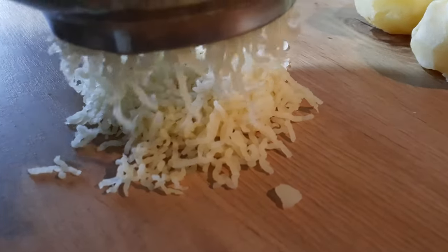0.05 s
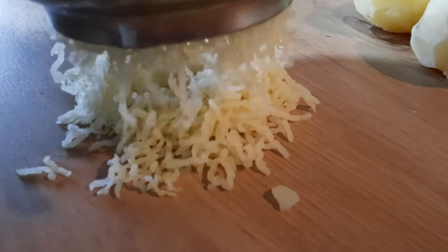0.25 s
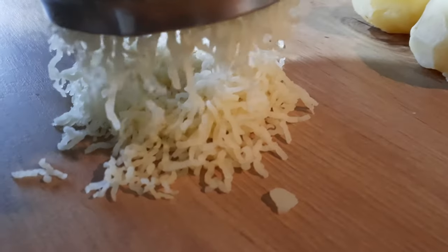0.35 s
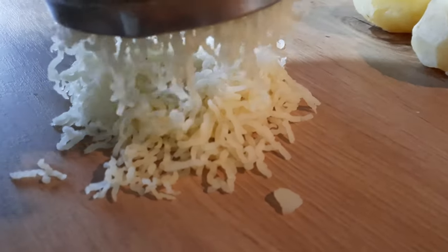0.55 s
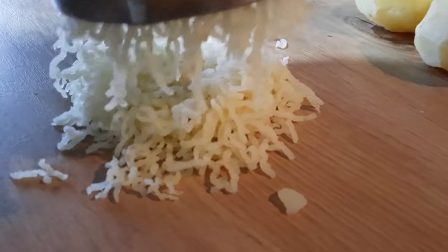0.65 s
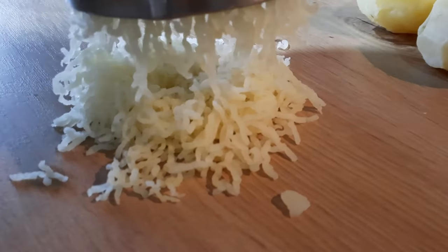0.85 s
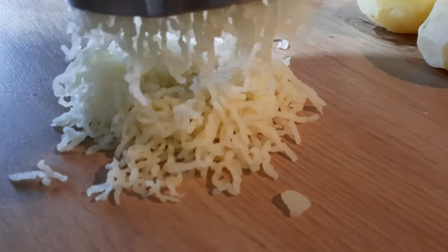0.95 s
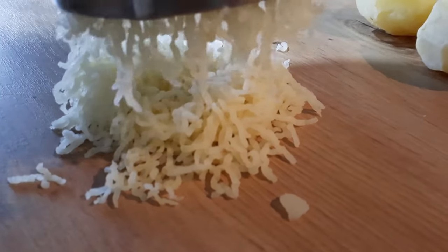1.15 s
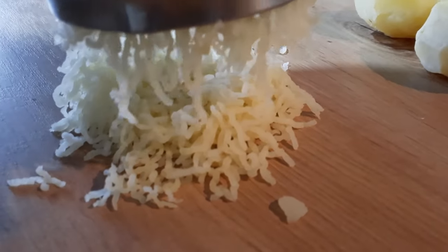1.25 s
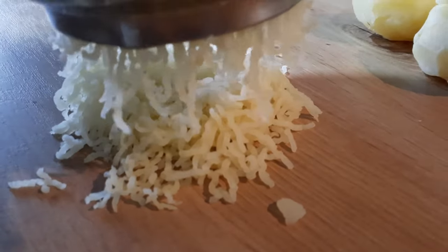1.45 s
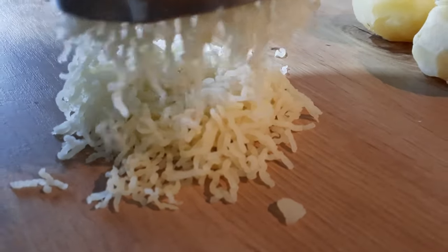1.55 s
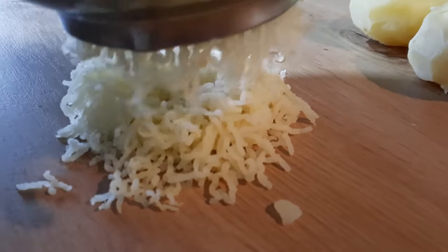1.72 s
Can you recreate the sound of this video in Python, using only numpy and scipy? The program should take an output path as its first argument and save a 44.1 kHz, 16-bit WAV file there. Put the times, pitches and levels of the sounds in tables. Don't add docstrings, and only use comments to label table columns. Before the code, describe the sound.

Metal food mill scraping potato through its perforated plate, gritty hiss and ringing catches, ending in a bright tick

```python
import sys
import numpy as np
from scipy import signal
from scipy.fft import rfft, irfft
from scipy.io import wavfile

SR = 44100
rng = np.random.default_rng(int(sys.argv[2]) if len(sys.argv) > 2 else 0)


def invert_db(x):
    u = np.asarray(x, float) / 20
    return 10 ** u


def put_to_file(sound):
    columns = np.atleast_2d(sound).T
    safe = np.clip(columns, -1, 1)
    whole_steps = np.round(safe * 32767)
    wavfile.write(sys.argv[1], SR, whole_steps.astype(np.int16))


N = 79380
HZ = np.arange(N // 2 + 1) * SR / N
LAG_S = 0.0004214
JOLT_S = 0.0082

# (time [s], level [dB])
PRESSURE = [(0.195, -74), (0.205, -48), (0.243, -61), (0.259, -47), (0.345, -50.5), (0.429, -38),
            (0.501, -38.5), (0.509, -39.5), (0.623, -36.5), (0.635, -47), (0.763, -49.5), (0.885, -48),
            (1.109, -59), (1.273, -45.5), (1.331, -76), (1.379, -41.5), (1.535, -50.5), (1.56, -81)]
# (time [s], level [dB], brightness [dB], bare metal contact [dB])
SPEED = [(0.19, -102, -6, -2), (0.204, -42, 5, 4), (0.242, -36, 0.5, 0.5), (0.284, -43.5, 2, -1),
         (0.42, -37.5, -1, -3.5), (0.535, -36, 0.5, 2), (0.62, -35.5, 0.5, -2), (0.75, -43, -0.5, -5.5),
         (0.982, -39.5, 3, 0.5), (1.144, -48, -1.5, 0.5), (1.2, -41, 0.5, 2.5), (1.38, -41.5, -0.5, 1.5),
         (1.44, -36, 0, 2.5), (1.472, -33.5, 2.5, -1), (1.485, -29.5, 1, 0), (1.528, -30, 4.5, -1),
         (1.54, -31.5, 8, -1), (1.56, -52, -2, 3)]
# (frequency [Hz], width [Hz], level [dB], pan [dB])
BOWL = [(2139, 145, -2, -1.5), (2163, 140, -7.5, 9), (2274, 63, -5, 0.5), (2343, 87, 1, 4),
        (2410, 140, -1.5, 1.5), (2580, 215, 0, 2), (2700, 250, -12, 15)]
# (frequency [Hz], width [Hz], level [dB], pan [dB])
FRAME = [(146, 33, -14, -3), (305, 100, -9, 2.5), (534, 133, -6.5, 2), (701.4, 47, -6, 1),
         (779.5, 37, -8.5, 0.5), (833.8, 22, -5.5, 0), (970, 180, -6.5, 4), (1463, 195, -2, 1),
         (1644, 110, 0.5, -0.5), (1812, 73, -2.5, 1), (1946, 123, -6, -7.5), (2318, 310, -1, 4),
         (2887, 250, -1.5, 0.5), (3270, 650, -4.5, -6)]
# (time [s], peak [dB])
CATCHES = [(0.2196, -30.5), (0.2288, -36), (0.2403, -26), (0.2496, -29.5), (0.3649, -34), (0.373, -30),
           (0.4, -30), (0.4078, -30), (0.4168, -28.5), (0.4229, -22), (0.4327, -30), (0.4418, -22.5),
           (0.4475, -27), (0.455, -28), (0.4644, -27), (0.4683, -29.5), (0.4748, -22.5), (0.505, -30),
           (0.5115, -28), (0.523, -21), (0.5305, -24.5), (0.5355, -22), (0.5414, -28.5), (0.5469, -24),
           (0.5529, -38), (0.5666, -26), (0.5801, -31), (0.5862, -32), (0.6019, -28), (0.6127, -25.5),
           (0.6231, -39), (0.6599, -40), (0.7022, -48), (0.72, -37), (0.7451, -44), (0.844, -33),
           (0.97, -33), (0.9802, -36), (0.9978, -37), (1.181, -36), (1.1853, -35), (1.2039, -34),
           (1.256, -35), (1.2699, -39), (1.2789, -45), (1.288, -39), (1.3702, -28), (1.3739, -31),
           (1.3811, -32), (1.3949, -27), (1.4028, -34), (1.4494, -30), (1.4567, -39), (1.4628, -34),
           (1.4918, -40), (1.5022, -28), (1.5295, -37), (1.5356, -44)]
# (time [s], peak [dB])
JOLTS = [(.24, -25), (.342, -27), (.367, -19), (.424, -19.5), (.443, -14), (.53, -10.5), (.602, -20),
         (.64, -15), (.70, -29), (.888, -12), (.905, -15.5), (1.19, -16), (1.21, -20.5), (1.40, -15.5),
         (1.45, -22), (1.50, -22), (1.515, -25)]
# (frequency [Hz], density [dB per Hz])
SNAP = [(1000, -40), (3000, -28), (5500, -18), (8000, -6), (9700, -12), (11800, 0), (14500, -2),
        (18500, -12)]


def rms_one(x):
    return x / np.sqrt(np.mean(x ** 2) + 1e-20)


def in_time(rows):
    s, *columns = np.transpose(rows)
    return [np.interp(np.arange(N) / SR, s, c) for c in columns]


def at_hz(points, axis=1):
    table = np.transpose(points)
    return np.interp(np.log(HZ + 1), np.log(table[0] + 1), table[axis])


def touching():
    t = np.arange(N) / SR
    start = np.clip((t - PRESSURE[0][0]) / .012, 0, 1)
    end = np.clip((PRESSURE[-1][0] - t) / .015, 0, 1)
    return start * end


def drift(rate_hz):
    r = np.exp(-2 * np.pi * rate_hz / SR * 10)
    noise = rng.standard_normal(N // 10 + 3002)
    slow = signal.lfilter([1], [1, -2 * r, r * r], noise)[3000:]
    return np.interp(np.arange(N) / 10, np.arange(len(slow)), rms_one(slow))


def decay_s(width_hz):
    return np.log(1000) / np.pi / width_hz


def ring(x, hz, t60):
    r = invert_db(-60 / (t60 * SR))
    w = 2 * np.pi * hz / SR
    return signal.lfilter([0, np.sin(w)], [1, -2 * r * np.cos(w), r * r], x + 1e-18)


def grit(rate, uneven_db, lump_db):
    sizes = invert_db(uneven_db * np.minimum(rng.exponential(1, N), 5)) * rng.choice([-1, 1], N)
    impacts = rms_one(sizes * (rng.random(N) < rate / SR))
    friction = .5 * rng.standard_normal(N)
    return rms_one((impacts + friction) * invert_db(lump_db * (drift(90) + .5 * drift(20))))


def strikes(rows, spread_s):
    out = np.zeros(N + SR)
    size = int(8 * spread_s * SR)
    fade = np.exp(-np.arange(size) / (spread_s * SR))
    bursts = rng.standard_normal((len(rows), 3000))[:, :size] * fade
    for row, burst in zip(rows, bursts):
        i = int(row[0] * SR)
        out[i:i + size] += invert_db(row[1]) * burst / np.sqrt(np.sum(burst ** 2))
    return out[:N]


def placed(x, pan_db, lag_s):
    late = np.interp(np.arange(N) - lag_s * SR, np.arange(N), x)
    return np.array([x * invert_db(pan_db / 2), late * invert_db(-pan_db / 2)])


def body(drive, modes):
    out = 0
    for k, (hz, width_hz, db, pan_db) in enumerate(modes):
        flutter = invert_db(1.2 * drift(12) + 1.3 * drift(3))
        tone = ring(drive * flutter, hz, decay_s(width_hz)) * np.sqrt(width_hz)
        lag_s = LAG_S * min(hz / 1300, 1) * rng.uniform(.7, 1.2)
        out = out + (-1) ** k * invert_db(db) * placed(tone, pan_db + 1.5 * drift(3), lag_s)
    return out


def air():
    # (frequency [Hz], density [dB per Hz])
    low_air = [(25, -6), (60, 1), (150, -9.5), (280, 3), (520, -6), (900, -5.5), (1200, -18), (1500, -32)]
    high_air = [(1000, -49), (1450, -19.5), (2000, -20.5), (2500, -18.5), (3900, -23), (6000, -16),
                (12000, -15), (18500, -8.5)]
    colour = invert_db(at_hz(low_air)) + invert_db(at_hz(high_air))
    mid, side = rfft(rng.standard_normal((2, N))) * colour
    alike = 0.94 / (1 + (HZ / 610) ** 2)
    both = np.sqrt(1 + alike) * mid + np.sqrt(1 - alike) * side * [[1], [-1]]
    noise = rms_one(irfft(both, N))
    hum_hz, hum_db, waver_db = 99.8, -63.5, 2.8
    phase = 2 * np.pi * hum_hz * np.arange(N) / SR + .5 * drift(4)
    hum = invert_db(hum_db + waver_db * drift(6)) * np.sqrt(2) * np.sin(phase)
    return invert_db(-53.5) * noise + hum * invert_db(np.array([[-1.5], [1.5]]))


def mash():
    # (time [s], level [dB])
    settling = [
        (0, -53),
        (.035, -83),
        (.045, -49.5),
        (.19, -59),
        (1.55, -48),
        (1.6, -63),
        (1.7, -61.5),
        (1.8, -66),
    ]
    level_db, = in_time(settling)
    crackle = np.array([grit(rate=2500, uneven_db=2.5, lump_db=2) for _ in range(2)])
    bright = rms_one(irfft(rfft(crackle) * invert_db(at_hz(SNAP)), N))
    in_frame = invert_db(-10) * rms_one(body(crackle[1], FRAME))
    in_bowl = invert_db(-11) * rms_one(body(crackle[0], BOWL))
    return invert_db(level_db) * (bright + in_frame + in_bowl)


def ticks():
    # (time [s], peak [dB])
    snap_times = [(.021, -42), (.0404, -30), (.0448, -37), (.057, -44), (.074, -42.5), (.082, -47),
                  (.117, -44), (.0886, -45), (.1471, -44), (.1612, -36), (.3415, -37), (.3985, -39),
                  (.445, -29), (.528, -27), (.536, -25), (.597, -28), (.70, -34), (1.185, -32),
                  (1.4341, -24), (1.481, -22), (1.496, -19), (1.5045, -27), (1.611, -40), (1.655, -38),
                  (1.6866, -43.5), (1.7155, -49), (1.729, -37)]
    # (time [s], peak [dB])
    slip_times = [
        (1.5325, -13),
        (1.5338, -16),
        (1.535, -16),
        (1.5365, -20),
        (1.539, -27),
    ]
    # (frequency [Hz], level [dB], 60 dB decay [s])
    edge_modes = [(8200, -5, .008), (11390, 0, .011), (11850, -3, .008), (12660, -3, .008),
                  (14000, -3, .007)]
    burst = strikes(snap_times, spread_s=.0007)
    slip = strikes(slip_times, spread_s=.0007)
    snap = irfft(rfft(burst + .55 * slip) * invert_db(at_hz(SNAP) + 18.5), N)
    edge = sum(invert_db(db) * ring(slip, hz, t60) for hz, db, t60 in edge_modes)
    return placed(snap + invert_db(-12) * edge, 0, LAG_S)


def hiss():
    # (frequency [Hz], density [dB per Hz])
    hiss_colour = [(2000, 2), (3000, -6.5), (4800, -10.5), (6500, -9.5), (8000, -3), (10000, -1),
                   (13000, -2.5), (18500, -5.5)]
    # (frequency [Hz], width [Hz], level [dB])
    whistle_modes = [(4574, 60, -19.5), (5750, 26, -33), (6216, 45, -10.5), (6840, 98, -18),
                     (7684, 80, -21), (8130, 270, -15.5), (11390, 89, -27)]
    zone_edges = [0, 3600, 4400, 5300, 6300, 7300, 8600, 9600, 11500, 14000, 30000]
    level_db, bright_db, bare_db = in_time(SPEED)
    common, own = [grit(rate=9000, uneven_db=2.6, lump_db=1.2) + invert_db(38) * strikes(JOLTS, JOLT_S)
                   for _ in range(2)]
    whistles = 0
    for hz, width_hz, db in whistle_modes:
        tone = rms_one(ring(common, hz, decay_s(width_hz)))
        whistles = whistles + invert_db(db + bare_db + 2 * drift(19)) * tone
    common = common + whistles

    alike = 0.0057
    right = rfft(np.sqrt(alike) * common + np.sqrt(1 - alike) * own)
    right = np.exp(-2j * np.pi * HZ * LAG_S) * right
    low_cut = np.sqrt(1 + (2600 / (HZ + 1)) ** 8)
    both = np.array([rfft(common), right]) * invert_db(at_hz(hiss_colour)) / low_cut

    out = 0
    for low_hz, high_hz in zip(zone_edges, zone_edges[1:]):
        below_top = 1 / (1 + (HZ / high_hz) ** 16)
        below_bottom = (low_hz > 0) / (1 + (HZ / (low_hz + 1)) ** 16)
        tilt_db = np.sign(low_hz - 9000) * bright_db + .7 * bare_db * (5000 < low_hz < 7000)
        patch_db = 1.6 * (drift(5) + .6 * drift(25))
        out = out + irfft(both * (below_top - below_bottom), N) * invert_db(tilt_db + patch_db)
    return invert_db(level_db + 2.0) * touching() * out / np.sqrt(np.mean(irfft(both, N) ** 2))


def bowl():
    press_db, = in_time(PRESSURE)
    speed_db = in_time(SPEED)[0]
    catches = strikes(CATCHES, spread_s=.0007)
    scrape = invert_db(press_db - 39.5) * touching() * grit(rate=1700, uneven_db=0.0, lump_db=0.5)
    main = body(scrape + invert_db(-30) * catches, BOWL)

    frame_db = -43.5 + 0.14 * (press_db + 43.5) + 0.21 * (speed_db + 44.5)
    rub = invert_db(frame_db - 44.5) * touching() * grit(rate=3000, uneven_db=2.5, lump_db=1.16)
    frame = body(rub + invert_db(-40.5) * catches + invert_db(-43) * strikes(JOLTS, JOLT_S), FRAME)
    dip_hz, dip_width_hz, dip_depth = 1125, 123, 0.46
    dip = 1 - dip_depth / (1 + ((HZ - dip_hz) / dip_width_hz) ** 2)
    return main + knocks() + irfft(rfft(frame) * dip, N)


def knocks():
    knock_hz, spread_hz, rise_s, peak_s = 2345, 55, .0016, .0012
    out = np.zeros(N + SR)
    t = np.arange(-100, 500) / SR
    swell = np.exp(-((t - peak_s) / np.where(t < peak_s, rise_s, 1.4 * rise_s)) ** 2)
    for (s, db), off in zip(CATCHES, rng.standard_normal(len(CATCHES))):
        i = int((s + t[0]) * SR)
        out[i:i + len(t)] += invert_db(db) * swell * np.sin(2 * np.pi * (knock_hz + spread_hz * off) * t)
    return placed(invert_db(-7) * out[:N], 2.7, LAG_S)


def kitchen(x):
    low_t60_s, treble_t60_s, treble_db, wall_cut_hz = 0.33, 0.26, -9, 1620
    t = np.arange(SR // 2) / SR
    first_walls = np.clip((t - .008) / .01, 0, 1)
    slow, fast = rng.standard_normal((2, 2, len(t))) * first_walls
    dull = signal.lfilter(*signal.butter(1, wall_cut_hz, fs=SR), slow)
    tail = dull * invert_db(-60 * t / low_t60_s) + fast * invert_db(treble_db - 60 * t / treble_t60_s)
    return signal.fftconvolve(x, tail / np.sqrt(np.sum(tail ** 2) / 2), axes=1)[:, :N]


def scene():
    mill = mash() + ticks() + hiss() + bowl()
    return mill + invert_db(-12) * kitchen(mill) + air()


def band_limit(x):
    return signal.sosfilt(signal.butter(12, 19130, fs=SR, output="sos"), x)


def record(dry):
    # (frequency [Hz], colour [dB], left minus right [dB])
    ports = [(387, 2.5, 0.5), (1710, 4.5, 4.5), (3640, -0.5, 7), (6520, 3.5, -5), (8500, 2, 6.5),
             (9100, -14.5, 25), (10400, -6.5, 7), (11340, -5, 26)]
    # (from frequency [Hz], left minus right [dB])
    top_bands = [(10300, 10), (11400, 7), (12500, 5.5), (13800, 1), (17000, -3)]
    sides = np.array([[.5], [-.5]])
    spectrum = rfft(dry) * invert_db(at_hz(ports)) * HZ ** 2 / (HZ ** 2 + 45 ** 2)
    x = irfft(spectrum * invert_db(sides * at_hz(ports, axis=2)) * (HZ < top_bands[0][0]), N)

    shared = spectrum[0] + invert_db(-25) * spectrum[1] * np.sign(sides)
    steps = rng.standard_normal((len(top_bands), N // 2048 + 1))
    steps = np.repeat(steps, 2048, axis=1)[:, :N]
    ends_hz = [row[0] for row in top_bands[1:]] + [SR]
    for (low_hz, pan_db), high_hz, step in zip(top_bands, ends_hz, steps):
        gains = invert_db(sides * (pan_db + 1.1 * step))
        band = irfft(shared * (HZ >= low_hz) * (HZ < high_hz), N)
        x = x + band * gains / gains.mean(axis=0)
    top_cut = signal.cheby2(14, 70, 18800, fs=SR, output="sos")
    return band_limit(signal.sosfilt(top_cut, x))


dry = scene()
out = record(dry)
put_to_file(out)
```